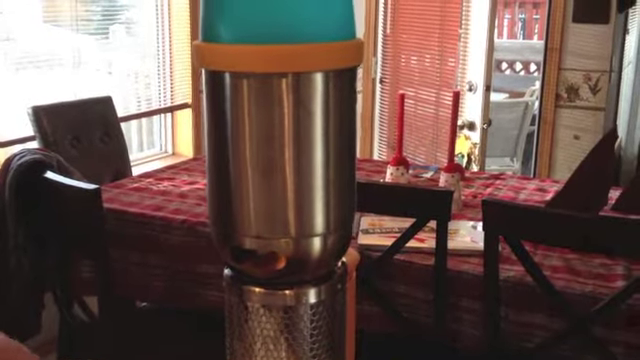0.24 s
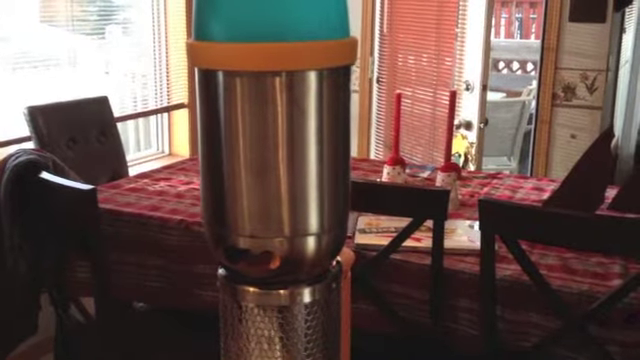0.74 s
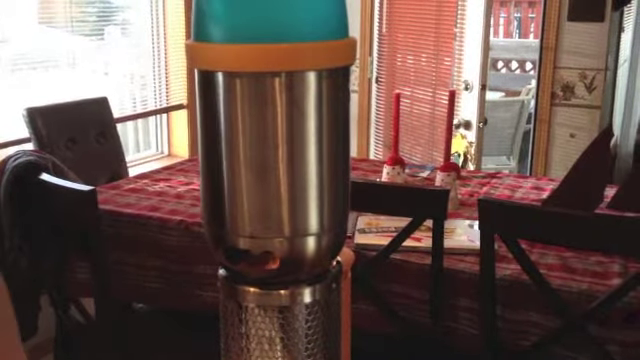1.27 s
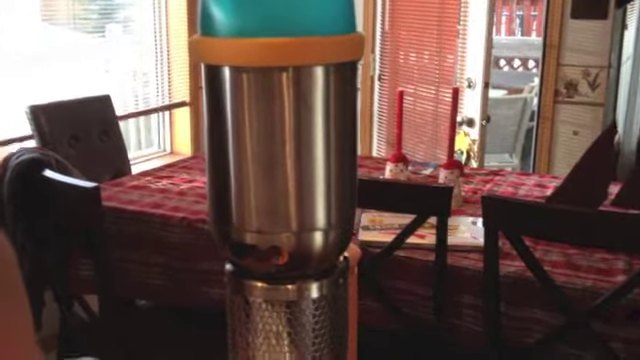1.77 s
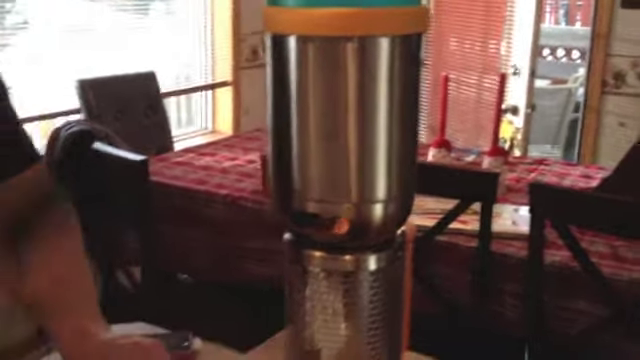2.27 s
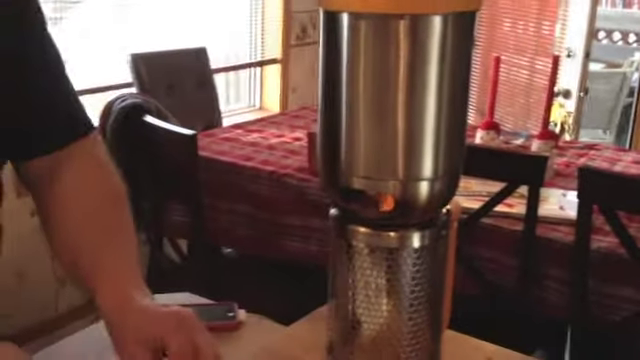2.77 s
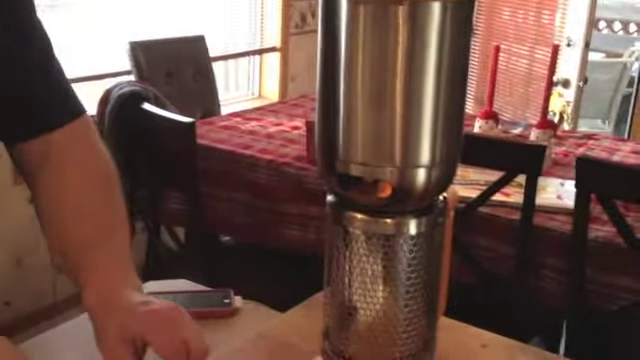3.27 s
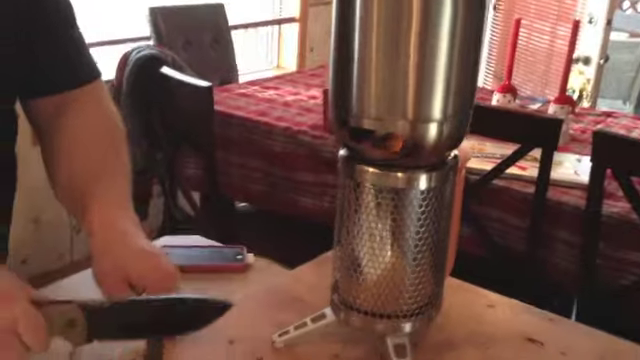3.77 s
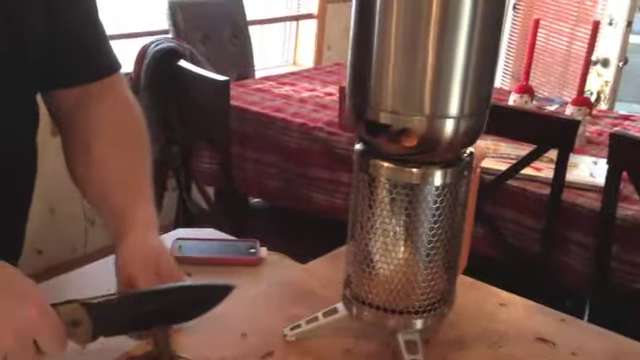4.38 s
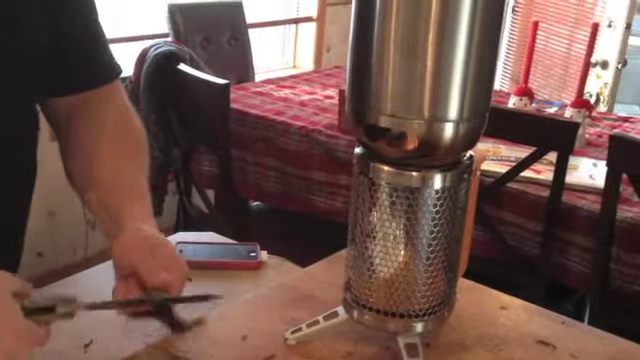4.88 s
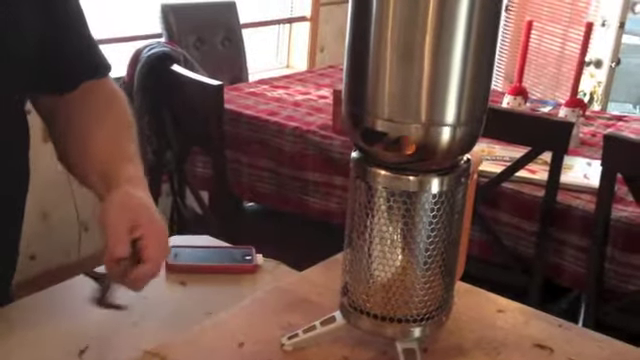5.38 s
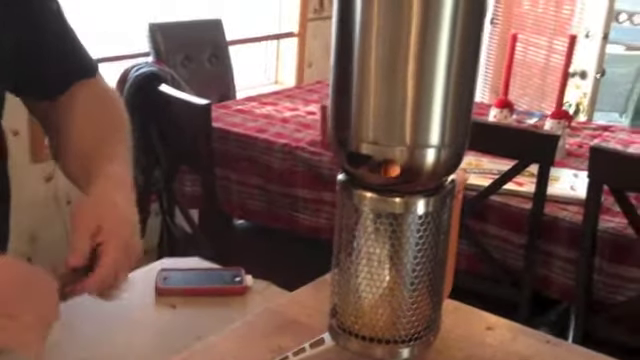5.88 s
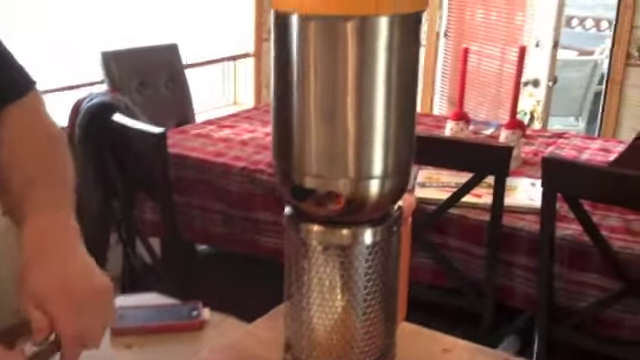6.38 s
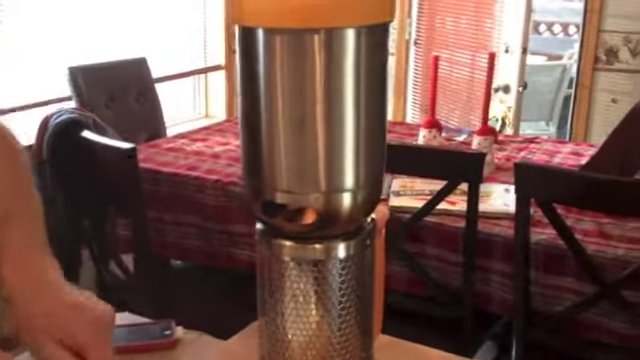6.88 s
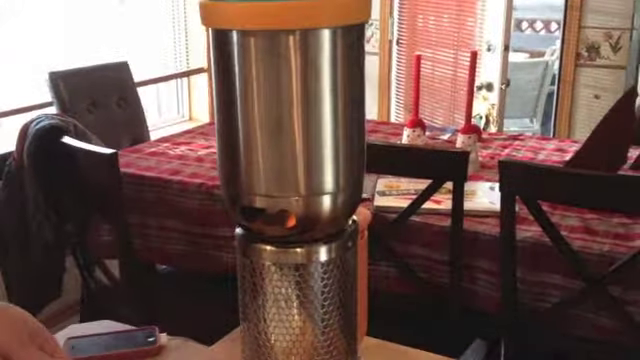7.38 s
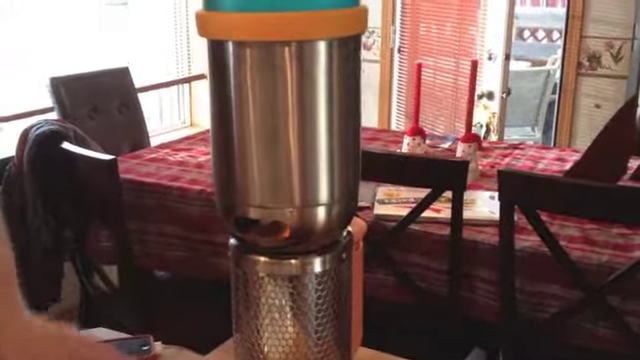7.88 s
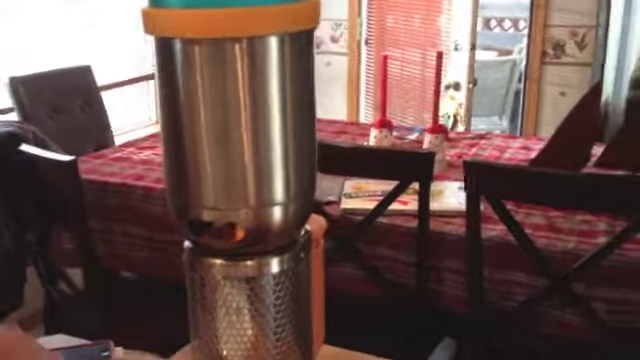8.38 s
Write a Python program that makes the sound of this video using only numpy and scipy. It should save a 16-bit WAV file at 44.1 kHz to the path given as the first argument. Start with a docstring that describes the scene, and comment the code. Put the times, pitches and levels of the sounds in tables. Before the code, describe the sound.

A small stove fan whirs thinly indoors as two hard knocks ring a wooden tabletop, then loose clatter, sharp stick snaps and crackling fibres.

```python
"""A small wood-burning camp stove whirs on a table in a room: rushing air, hollow tones and a thin motor whine.
Beside it kindling is split with a knife: two hard knocks set the tabletop ringing and fill the room with echo.
Then knife and wood clatter down, a stick snaps in bright bursts, and its fibres tear in a crackle of tiny clicks.
The recorder's gain ducks at the knocks and creeps back."""
import sys
import numpy as np
from scipy import signal
from scipy.fft import rfft, irfft
from scipy.io import wavfile
from scipy.ndimage import uniform_filter1d

SR = 44100
rng = np.random.default_rng(int(sys.argv[2]) if len(sys.argv) > 2 else 0)


def inscribe(sig):
    """Save sig as 16-bit PCM at rate SR to the path in sys.argv[1].

    A 1-D sig is mono; a 2-D sig holds one channel per row.
    Samples are clipped to [-1, 1] before scaling.
    """
    pcm = np.round(np.clip(np.atleast_2d(sig).T, -1, 1) * 32767)
    wavfile.write(sys.argv[1], SR, pcm.astype(np.int16))


N = 381024
TIME = np.arange(N) / SR
SHORT = SR // 2   # samples in half a second, the length of every short sound
SHORT_TIME = TIME[:SHORT]


def from_db(db):
    """Turn decibels into a gain."""
    return 10 ** (np.asarray(db) / 20)


def rms_one(x):
    """Scale a sound to an average (rms) level of 1."""
    return x / np.sqrt(np.mean(x ** 2) + 1e-20)


def at_hz(points, hz):
    """Read a table between its points, with frequency on a log scale as the ear hears it."""
    f, value = np.transpose(points)
    return np.interp(np.log(np.maximum(hz, 1)), np.log(f), value)


def coloured(x, spectrum):
    """Make each frequency louder or softer as the table says; the result has rms 1."""
    hz = np.fft.rfftfreq(len(x), 1 / SR)
    gain = from_db(at_hz(spectrum, hz))
    return rms_one(irfft(rfft(x) * gain, len(x)))


def one_pole(x, hz, kind):
    """Gently remove what lies above ("low") or below ("high") a frequency."""
    return signal.lfilter(*signal.butter(1, min(hz, SR / 2 - 1), kind, fs=SR), x)


def low_cut(x, hz, order):
    """Remove the bass; a higher order cuts more steeply."""
    return signal.sosfilt(signal.butter(order, hz, "high", fs=SR, output="sos"), x)


def bell(x, hz, q, db):
    """Raise or lower one broad resonance."""
    gain = from_db(db)
    peak = signal.iirpeak(hz, q * np.sqrt(gain), fs=SR)
    return x + (gain - 1) * signal.lfilter(*peak, x)


def add(out, s, sound):
    """Mix a sound in at a time in seconds."""
    at = round(s * SR)
    out[at:at + len(sound)] += sound[:N - at]


def dying(t60):
    """Half a second of exponential decay that falls by 60 dB in t60 seconds."""
    return np.exp(-np.log(1000) * SHORT_TIME / t60)


def burst(spectrum, t60):
    """The short noisy crack of a contact or fracture."""
    return coloured(rng.standard_normal(SHORT), spectrum) * dying(t60)


def struck(modes, scatter_db):
    """Sines that start together and decay; each blow lands elsewhere and weights them anew."""
    out = np.zeros(SHORT)
    for hz, db, t60 in modes:
        level = from_db(db + scatter_db * rng.standard_normal())
        out += level * np.sin(2 * np.pi * hz * SHORT_TIME) * dying(t60)
    return out


# how fast echoes die in the room: (frequency [Hz], time to fall 60 dB [s])
ROOM_DECAY = [(100, 0.42), (260, 0.27), (700, .34), (1840, 0.33), (4850, 0.26), (12800, 0.23)]


def room_tail(spectrum, build_s):
    """Dense echoes build up, then die away, each frequency band at its own pace."""
    noise = rfft(coloured(rng.standard_normal(SHORT), spectrum))
    hz = np.fft.rfftfreq(SHORT, 1 / SR)
    out = np.zeros(SHORT)
    for centre, t60 in ROOM_DECAY:
        # neighbouring bands blend smoothly into each other
        share = at_hz([(f, f == centre) for f, _ in ROOM_DECAY], hz)
        out += irfft(noise * share, SHORT) * dying(t60)
    return out * (1 - np.exp(-SHORT_TIME / build_s))


# times when the motor's whine fades away: (start [s], end [s], depth [dB])
WHINE_FADES = [(0.15, 0.357, 8), (3.847, 5.44, 12), (6.07, 6.75, 7)]


def whine_gain():
    """A slightly wavering level that slides into each fade and out again."""
    level_db, slide_s = -57.5, 0.021
    waver_db, waver_hz = 1.9, 2.9
    lost_db = np.zeros(N)
    for start, end, depth_db in WHINE_FADES:
        enter = np.tanh((TIME - start) / slide_s)
        leave = np.tanh((TIME - end) / slide_s)
        lost_db += depth_db * (enter - leave) / 2
    slow_noise = one_pole(rng.standard_normal(N), waver_hz, "low")
    waver = rms_one(one_pole(slow_noise, waver_hz, "low"))
    return from_db(level_db - lost_db + waver_db * waver)


def motor_whine(overtone_db):
    """A turning motor hums at its own pitch and an octave above; its speed wanders a little."""
    pitch_hz = 1920
    wander = rms_one(one_pole(rng.standard_normal(N), 8, "low"))
    speed = 1 + 0.0008 * wander
    phase = 2 * np.pi * np.cumsum(pitch_hz * speed) / SR
    tone = np.sin(phase) + from_db(overtone_db) * np.sin(2 * phase)
    return np.sqrt(2) * whine_gain() * tone   # a sine of height sqrt(2) has rms 1


# colour of air rushing through the stove: (frequency [Hz], relative level [dB per Hz])
AIR_COLOUR = [(30, -39), (62, -37), (100, -17.5), (165, -3), (300, -1.5), (560, -2), (800, -2),
              (1150, -8.5), (2200, -13), (3400, -19), (4600, -24.5), (7300, -30.5), (10000, -40.5),
              (15000, -40.5)]
# hollow resonances of the stove body: (frequency [Hz], width of one filter pass [Hz], rms level [dB])
STOVE_HOLLOWS = [(174.5, 21, -61.5), (354.6, 29, -60), (465.6, 33.4, -53.5), (506, 7.3, -57.5),
                 (752, 73, -53), (4445, 530, -68)]


def stove_fan(air_db, overtone_db):
    """Rushing air is broad noise, the hollow body favours a few pitches, and the motor whines."""
    out = from_db(air_db) * coloured(rng.standard_normal(N), AIR_COLOUR)
    for hz, width, db in STOVE_HOLLOWS:
        peak = signal.iirpeak(hz, hz / width, fs=SR)
        once = signal.lfilter(*peak, rng.standard_normal(N))
        out += from_db(db) * rms_one(signal.lfilter(*peak, once))
    return out + motor_whine(overtone_db)


# colour of tearing fibres: (frequency [Hz], relative level [dB per Hz])
FIBRE_COLOUR = [(1500, -28), (3200, -7.5), (5500, -4.5), (9000, -13), (15000, -11)]
# pulls on the fibres, each swelling and easing: (middle [s], half length [s], level [dB])
PULLS = [(7.054, 0.025, -50.5), (7.59, 0.099, -49.5), (8.65, 0.058, -49.5)]


def tearing_fibres(per_s):
    """Fibres rub and tear in a dense crackle of tiny breaks of uneven size, per_s of them a second."""
    breaks = (rng.random(N) < per_s / SR) * rng.standard_normal(N)
    effort = np.zeros(N)
    for middle, half_s, db in PULLS:
        effort += from_db(db) * np.exp(-((TIME - middle) / half_s) ** 2)
    return effort * coloured(breaks, FIBRE_COLOUR)


# wood breaking and small splinters giving way: (time [s], level [dB])
SNAPS = [(1.178, -45.5), (3.866, -47), (4.8082, -32), (5.886, -44), (6.7376, -32.5), (6.7527, -14),
         (6.7620, -11.5), (7.042, -46), (7.559, -40.5), (7.6252, -34.5)]
# colour of breaking wood: (frequency [Hz], relative level [dB per Hz])
SPLINTER_COLOUR = [(40, -31), (300, -37), (1600, -16), (2500, -8.5), (3050, 3), (4500, 0.5), (4910, 7.5),
                   (5400, -2), (7500, 0), (9800, -7.5), (13200, -7.5), (15500, -9)]


def stick_snaps(full_crack_t60, tail_db):
    """Wood breaks in bright bursts, each with its echo; full_crack_t60 is the length [s] at 0 dB."""
    stretch = 0.1   # dB of length per dB of strength: a big fracture takes longer to run through
    out = np.zeros(N)
    for s, db in SNAPS:
        crack = burst(SPLINTER_COLOUR, full_crack_t60 * from_db(stretch * db))
        echo = from_db(tail_db) * room_tail(SPLINTER_COLOUR, build_s=0.0011)
        add(out, s, from_db(db) * (crack + echo))
    return out


# modes of the tabletop, first the quickly damped heave of the whole board:
# (frequency [Hz], relative level [dB], time to fall 60 dB [s])
TABLETOP_MODES = [(171.4, 6.5, 0.11), (288.2, 3, 0.12), (430, 2.5, 0.067), (125, -8, 0.15),
                  (164.2, -3.5, 0.22), (192.6, -16, 0.23), (271.3, -5, 0.32), (305, -10.5, 0.36),
                  (421.2, -3, 0.26), (479, -1.5, 0.19), (545, -34, 0.084), (655, -9, 0.12),
                  (724, -12, 0.051), (881, -6.5, 0.079), (1030, -17, 0.36), (1201, -14.5, 0.27),
                  (1517, -17.5, 0.14), (1620, -26, 0.15), (2046, -2.5, 0.067), (2510, -16.5, 0.11),
                  (3890, -32, 0.15), (4440, -20.5, 0.09)]
# colour of the dense ring of table and room: (frequency [Hz], relative level [dB per Hz])
BODY_COLOUR = [(30, 2), (75, -23), (120, -6), (170, 9.5), (480, -2), (800, -7.5), (1500, -14.5),
               (2200, -16.5), (3000, -20.5), (4500, -21.5), (8000, -31), (10000, -36.5), (15000, -40)]
# colour of the crack of the contact itself: (frequency [Hz], relative level [dB per Hz])
CRACK_COLOUR = [(40, -25), (200, 11), (600, 4), (1200, -15.5), (2100, -4), (4000, -11), (7500, -17),
                (10000, -26), (15000, -26)]


def table_blow(modes_db, tail_db, crack_db, crack_t60, low_hz, high_hz, swell_s=0.0089):
    """One contact cracks, sets the tabletop ringing and fills the room."""
    swell = 1 - np.exp(-SHORT_TIME / swell_s)   # the heavy board takes a moment to move
    ring = from_db(modes_db) * struck(TABLETOP_MODES, scatter_db=1.0) * swell
    echo = from_db(tail_db) * room_tail(BODY_COLOUR, build_s=0.0016)
    crack = from_db(crack_db) * burst(CRACK_COLOUR, crack_t60)
    # light things drive little bass, soft contacts little treble
    without_bass = one_pole(ring + echo + crack, low_hz, "high")
    return one_pole(without_bass, high_hz, "low")


# modes of the knife: (frequency [Hz], relative level [dB], time to fall 60 dB [s])
BLADE_MODES = [(641, 0, .06), (926, -6, .16), (1720, -10, .1), (2335, -7, .16), (2420, -10, .13),
               (3526, -16, .1), (7246, -29, .14)]


def blade_ring(db):
    """The struck knife rings briefly at its own pitches."""
    return from_db(db) * struck(BLADE_MODES, scatter_db=2)


# loose wood and the knife land and bounce:
# (time [s], strength [dB], brightness: treble cutoff [Hz], ring of the blade [dB])
LANDINGS = [ (2.607, -22.5, 12000, -50), (5.3302, -20, 3600, -23), (5.387, -37.5, 4500, -30),
            (5.4157, -30.5, 3500, -31.5), (5.5082, -20.5, 1800, -40), (5.5270, -16.5, 3800, -44),
            (5.5430, -27.5, 5000, -50), (5.5935, -27, 1100, -50), (5.6153, -24.5, 1100, -50),
            (5.6232, -29, 6500, -50), (5.6550, -22.5, 520, -42), (5.6754, -25.5, 5000, -46),
            (5.7641, -33, 1110, -55)]


def clatter():
    """Light, hollow contacts of loose things on the same tabletop."""
    out = np.zeros(N)
    for s, db, high_hz, blade_db in LANDINGS:
        blow = table_blow(modes_db=-4.0, tail_db=-0.5, crack_db=10.5, crack_t60=0.015,
                          low_hz=207, high_hz=high_hz)
        hollow = bell(blow, hz=770, q=1, db=6.5)
        add(out, s, from_db(db) * hollow + blade_ring(blade_db))
    return out


# the knife is set on the kindling, then driven through it onto the board:
# (time [s], strength [dB], brightness: treble cutoff [Hz], ring of the stick [dB])
CHOPS = [(1.190, -31.5, 135, -3), (1.7757, -7, 14900, -2), (2.525, -1, 17000, 6.5)]


def chops():
    """Heavy blows reach deep; the stick is damped while pressed to the board and rings once it splits."""
    hard_hz = 6000   # a contact duller than this presses rather than cracks
    crack_db, blade_db = 7, -27   # relative to the strength of the chop
    out = np.zeros(N)
    for s, db, high_hz, wood_db in CHOPS:
        soft_db = 20 * np.log10(min(high_hz / hard_hz, 1))
        blow = table_blow(modes_db=-3.0, tail_db=-2.0, crack_db=crack_db + soft_db, crack_t60=0.017,
                          low_hz=45, high_hz=high_hz)
        with_stick = bell(blow, hz=1500, q=0.54, db=wood_db)
        add(out, s, from_db(db) * with_stick + blade_ring(db + blade_db + soft_db))
    return out


def scene():
    """Fan and handiwork, close to one microphone; the knocks, clatter and snaps carry little deep bass."""
    fan = stove_fan(air_db=-44.5, overtone_db=-14.5)
    fibres = tearing_fibres(per_s=2500)
    snaps = low_cut(stick_snaps(full_crack_t60=0.025, tail_db=-15), hz=900, order=1)
    landings = low_cut(clatter(), hz=124, order=2)
    knocks = low_cut(chops(), hz=104, order=3)
    return (fan + fibres + snaps + landings + knocks)[None]


def gain_control(x, limit_db, release_s, size):
    """The gain drops at once by the excess over the limit and recovers slowly."""
    power = uniform_filter1d(x[0] ** 2, size)   # running average over size samples
    level_db = 10 * np.log10(np.maximum(power, 1e-12))
    excess_db = np.maximum(level_db - limit_db, 0)
    # each drop shrinks exponentially; the largest one at any moment counts
    fade = np.exp(-TIME / release_s)
    drop_db = np.maximum.accumulate(excess_db / fade) * fade
    return x * from_db(-drop_db)


def record(dry):
    """The recorder controls the gain, rounds the peaks and steeply cuts the top treble."""
    level = gain_control(dry, limit_db=-10.0, release_s=0.91, size=700)
    top = 0.7   # rounded peaks stay below this
    rounded = level / (1 + (level / top) ** 6) ** (1 / 6)
    treble_cut = signal.ellip(10, 0.2, 70, 15500, fs=SR, output="sos")   # cutoff 15500 Hz
    return signal.sosfilt(treble_cut, rounded)


dry = scene()
out = record(dry)
inscribe(out)
```